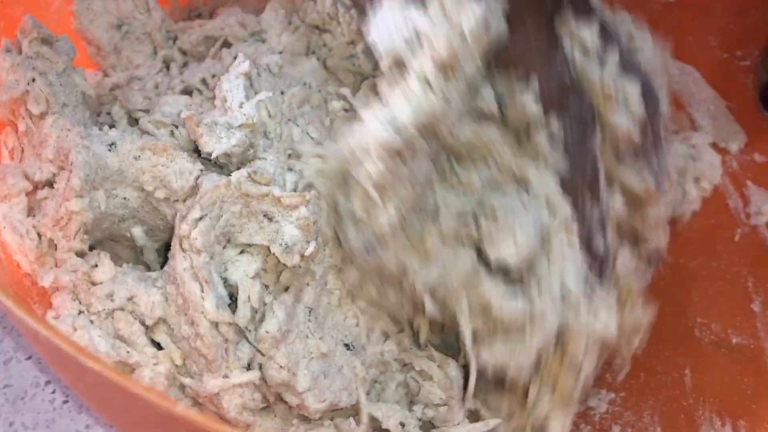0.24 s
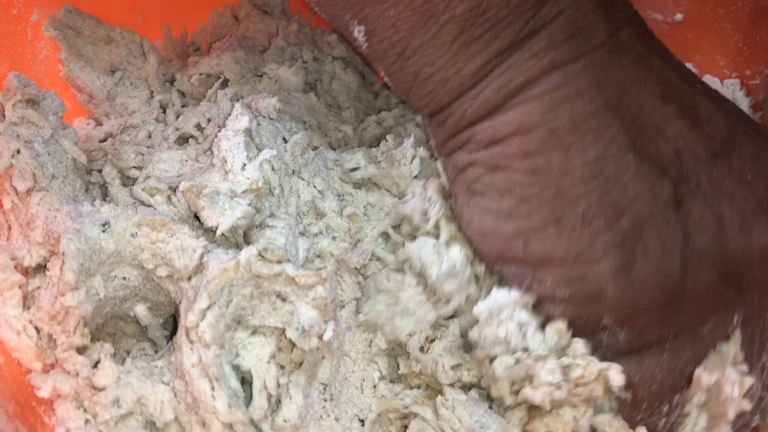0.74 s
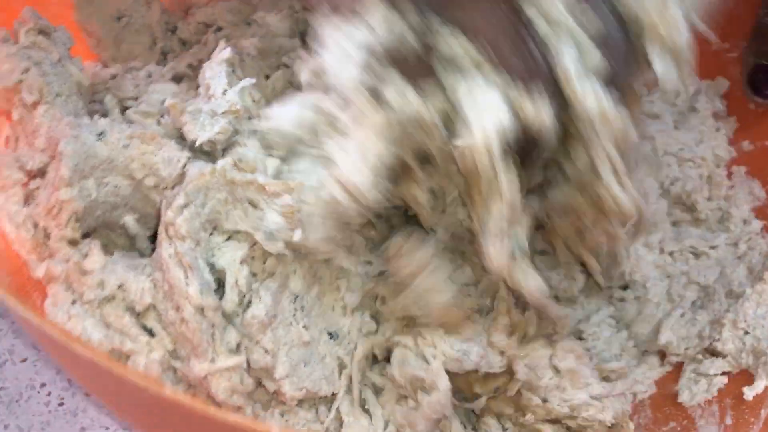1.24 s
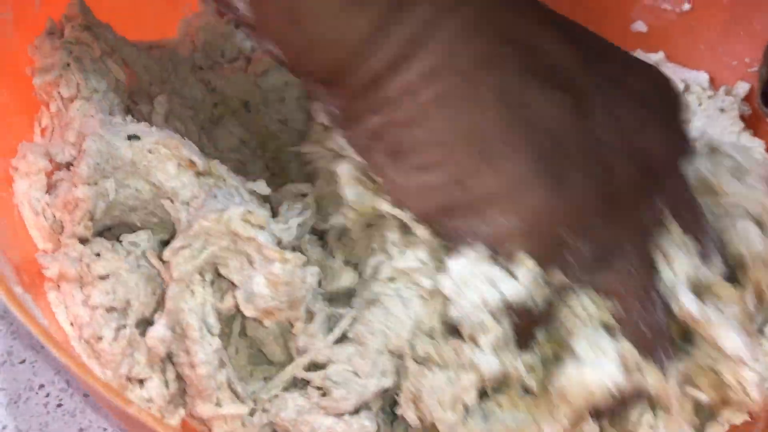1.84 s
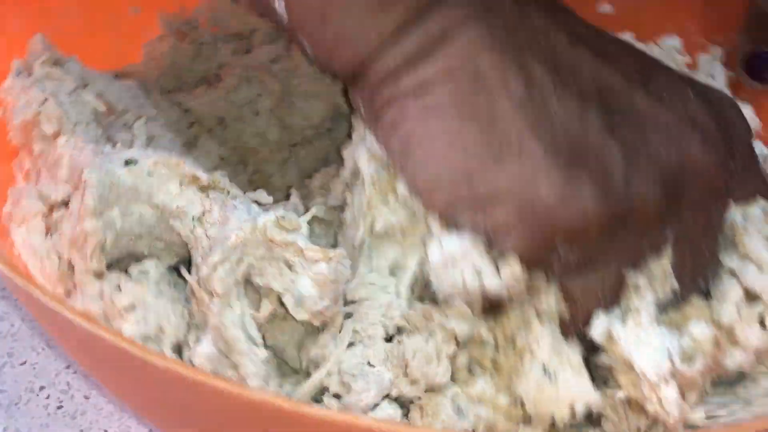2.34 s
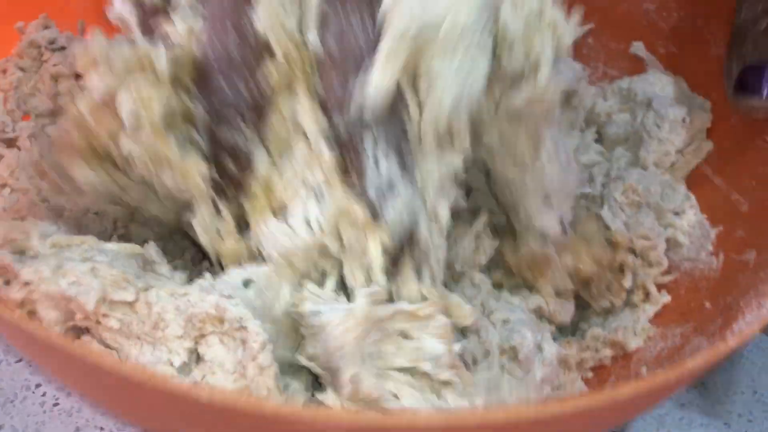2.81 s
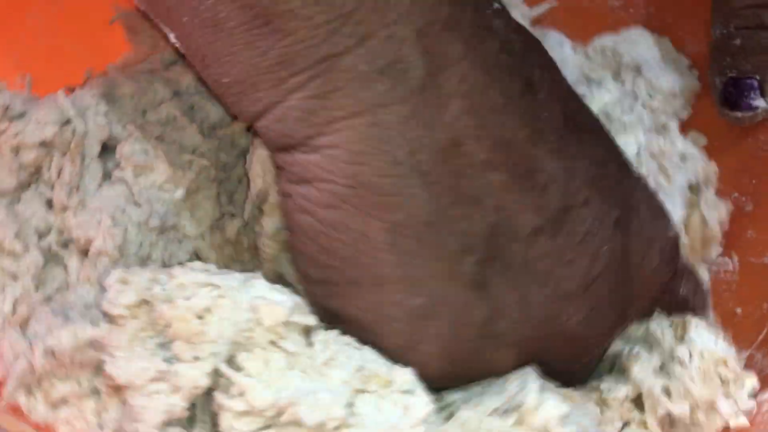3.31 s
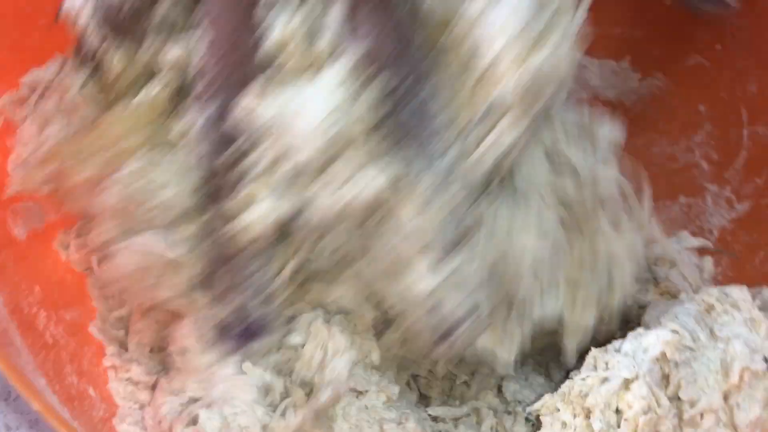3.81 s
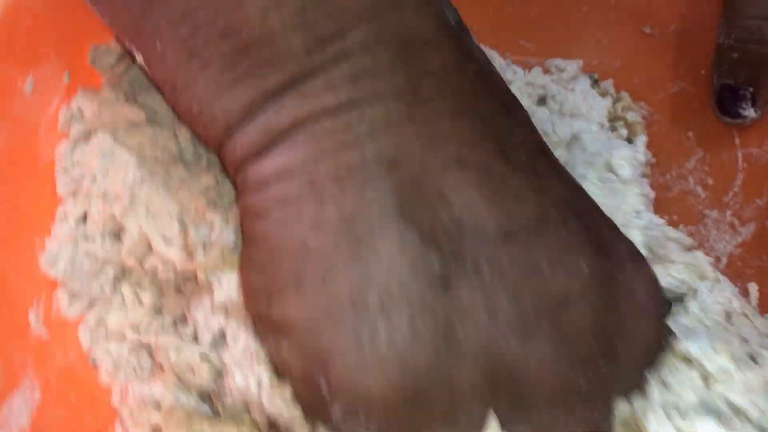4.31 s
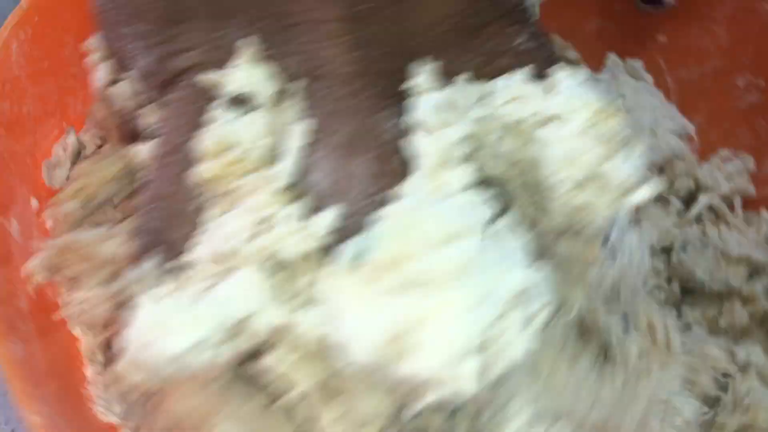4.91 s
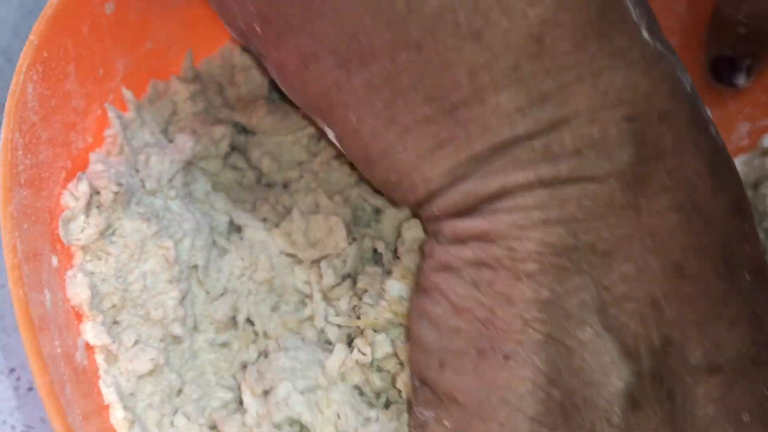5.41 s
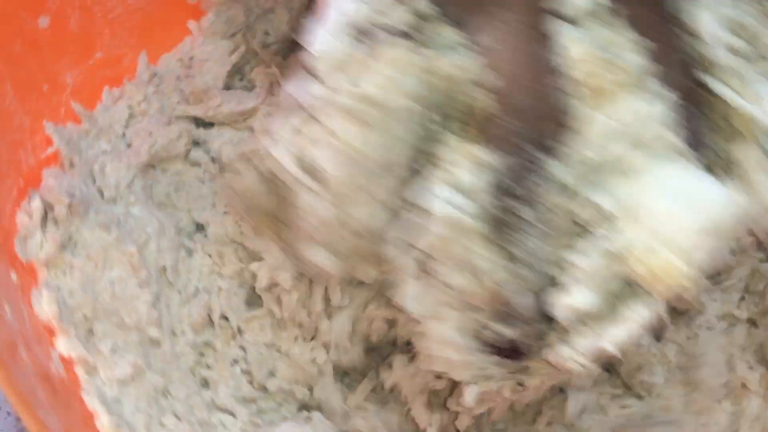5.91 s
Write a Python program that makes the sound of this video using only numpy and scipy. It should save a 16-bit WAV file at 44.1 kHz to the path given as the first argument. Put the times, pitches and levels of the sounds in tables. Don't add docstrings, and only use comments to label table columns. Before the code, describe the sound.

Close, gritty kneading of shaggy dough in a plastic bowl: dry scrapes, sticky squelches, crumb ticks and sudden dull thumps on a counter.

```python
import sys
import numpy as np
from scipy import signal
from scipy.fft import rfft, irfft
from scipy.io import wavfile
from scipy.ndimage import uniform_filter1d

SR = 44100
rng = np.random.default_rng(int(sys.argv[2]) if len(sys.argv) > 2 else 0)


def linear_from_db(decibels):
    return 10 ** (np.asarray(decibels, float) / 20)


def to_wav(s):
    ch = np.atleast_2d(s).T
    pcm = np.round(np.clip(ch, -1, 1) * 32767)
    wavfile.write(sys.argv[1], SR, pcm.astype(np.int16))


N = 271209
CONTROL = 64


def evened(x):
    return x / np.sqrt(np.mean(x ** 2) + 1e-20)


def add(mix, s, sound):
    part = mix[round(s * SR):][:len(sound)]
    part += sound[:len(part)]


def coloured(x, points):
    hz = np.fft.rfftfreq(len(x), 1 / SR)
    f, db = np.transpose(points)
    curve_db = np.interp(np.log(hz + 1), np.log(f + 1), db)
    return evened(irfft(rfft(x) * linear_from_db(curve_db), len(x)))


def resonate(x, hz, width_hz):
    return signal.lfilter(*signal.iirpeak(hz, hz / width_hz, SR), x)


def grit(spread_db, flutter_db, flutter_s):
    clumps = evened(uniform_filter1d(rng.standard_normal(N), int(flutter_s * SR)))
    size_db = spread_db * np.minimum(rng.exponential(1, N), 5)
    return evened(rng.standard_normal(N) * linear_from_db(size_db + flutter_db * clumps))


def ringing(hz, cycles, glide, t):
    turns = hz * t * (1 + glide * hz * t / cycles)
    wave = np.sin(2 * np.pi * turns) * hz * t * np.exp(-2.5 * hz * t / cycles)
    return wave / abs(wave).max()


def swell(s, db, rise_s, fall_s):
    t = np.arange(0, N + CONTROL, CONTROL) / SR - s
    rise, fall = abs(t / rise_s) ** 1.77, abs(t / fall_s) ** 1.39
    return linear_from_db(db - 10 * np.where(t < 0, rise, fall)) ** 2 + 1e-14


def swells(table):
    return np.array([swell(*row[:4]) for row in table])


def gain(power):
    return np.interp(np.arange(N) / CONTROL, np.arange(len(power)), np.sqrt(power))


# f/Hz, level/dB per Hz
ROOM_TONE = [(18, -44), (30, 5.5), (81, 3.5), (169, 0.5), (335, -7), (1990, -15.5), (8640, -26),
             (15800, -30)]
# f/Hz, width/Hz, level/dB rms
APPLIANCES = [(103.45, 3.9, -71), (178.1, 5, -70), (391.3, 3, -76.5)]


def kitchen():
    lines = sum(linear_from_db(db) * evened(resonate(rng.standard_normal(N), hz, w)) for hz, w, db in APPLIANCES)
    return linear_from_db(-62.5) * coloured(rng.standard_normal(N), ROOM_TONE) + lines


def reverb(x, t60=0.3):
    t = np.arange(SR // 2) / SR
    noise = signal.lfilter([1], [1, -.5], rng.standard_normal(len(t)))
    tail = noise * linear_from_db(-60 * t / t60) * (t > .004)
    return signal.fftconvolve(x, tail / np.linalg.norm(tail))[:N]


def strays():
    per_s, pitches = 60, np.geomspace(5000, 13000, 6)
    falls = rng.random(N) < per_s / SR
    shake = gain(swell(1.4, -66, .7, .7))
    size = shake * linear_from_db(3.5 * np.minimum(rng.exponential(1, N), 3)) * falls
    kind, t = rng.integers(0, 6, N), np.arange(200) / SR
    return sum(signal.oaconvolve(size * (kind == k), ringing(hz, 2.0, 0, t))[:N]
               for k, hz in enumerate(pitches))


# f/Hz, level/dB, t60/s
BOWL_MODES = [(81.8, 1, 0.21), (133.4, 2.5, 0.23), (145.6, -11.5, 1), (216, -6, 0.12), (243, 2.5, 0.105),
              (348, -15, 0.35), (482, -4, 0.042), (642, -4, 0.033), (840, 5.5, 0.012), (1174, 2, 0.01),
              (1900, -18.5, 0.021), (184.6, -16, 0.052), (550, -16, 0.1), (431, -22, 0.15)]
# peak t/s, level/dB, rise and fall/s, deepest modes over it/dB
LEANS = [(0.0, -56.5, 0.17, 1.5), (0.55, -62, 0.19, 8.5), (1.21, -68, 0.062, 4), (1.39, -73.5, .04, 17.5),
         (1.57, -70, 0.13, 6), (2.27, -73, 0.13, -6), (2.6, -59, 0.31, -11), (3.09, -61.5, 0.17, 10.5),
         (3.52, -65, 0.18, 14.5), (3.95, -52, .07, -5), (4.18, -72, 0.064, -14), (4.46, -69.5, 0.21, -8),
         (4.84, -65, 0.062, 9), (5.05, -66, .08, -5), (5.28, -57, 0.33, 2.5), (5.62, -62.5, 0.054, 2),
         (5.88, -64.5, 0.15, 8)]


def weight():
    rest_db, rest_deep_db = -68, -65
    leans = np.array([swell(s, db, length, length) for s, db, length, _ in LEANS])
    deep_db = np.transpose(LEANS)[-1]
    shoves = grit(spread_db=4.0, flutter_db=2.5, flutter_s=0.021)
    modes = [linear_from_db(db) * evened(resonate(shoves, hz, 1.44 * 1.5 / t60)) for hz, db, t60 in BOWL_MODES[:6]]
    deep = modes[0] + evened(resonate(shoves, 103, 20))
    press = gain(linear_from_db(rest_db) ** 2 + leans.sum(0))
    heavy = gain(linear_from_db(rest_deep_db) ** 2 + linear_from_db(deep_db) ** 2 @ leans)
    return linear_from_db(-4.0) * (press * evened(sum(modes[1:])) + heavy * evened(deep))


# peak t/s, level/dB, rise/s, fall/s
SHIVERS = [
    (2.76, -59, .05, .2),
    (2.93, -57.5, 0.17, .12),
    (3.12, -56, .1, 0.08),
]


def judder():
    turn = 2 * np.pi * 66 * np.arange(N) / SR
    wave = np.sin(turn) + linear_from_db(-4.5) * np.sin(2 * turn)
    return np.sqrt(2) * gain(swells(SHIVERS).sum(0)) * wave


# peak t/s, level/dB, rise/s, fall/s
DUST = [(1.14, -72, .05, .05), (1.686, -63, .006, .008), (1.76, -62, .007, .01), (2.735, -64, .008, .03),
        (2.8, -63, .02, .02), (4.93, -66, .05, .08), (4.76, -72, .06, .06), (5.048, -58, .006, .01),
        (5.68, -58, .025, .06), (6.0, -68, .06, .08), (6.12, -68, .02, .05)]
# peak t/s, level/dB, rise/s, fall/s
SQUEEZES = [(0.2, -68, 0.064, 0.074), (1.0, -72, .05, 0.065), (1.72, -65, .05, 0.036),
            (2.5, -63.5, 0.18, .05), (2.62, -69, 0.029, .04), (3.5, -64, .1, 0.12), (3.9, -64, 0.069, .06),
            (4.75, -64, 0.067, 0.032), (5.33, -58, .05, 0.21), (5.6, -65, 0.086, 0.14),
            (5.851, -67, 0.1, 0.04)]
# peak t/s, rasp level/dB, rise/s, fall/s, rasp centre f/Hz
SWEEPS = [(0.0, -45.5, .1, .13, 2830), (0.44, -53, .11, 0.12, 2900), (0.69, -56.5, 0.13, 0.18, 2800),
          (0.938, -62, 0.082, 0.048, 2500), (1.45, -67.5, 0.11, 0.44, 2370),
          (1.77, -79, 0.036, 0.021, 2100), (2.27, -58.5, 0.11, 0.24, 2100),
          (2.42, -61.5, 0.19, 0.092, 3060), (2.77, -64.5, 0.062, 0.035, 3120),
          (3.12, -61.5, 0.04, 0.5, 2025), (3.32, -58, 0.2, .25, 2680), (3.49, -50, 0.094, 0.061, 2420),
          (3.823, -49.5, 0.033, 0.019, 2070), (3.97, -56.5, 0.075, 0.094, 2230),
          (4.27, -69, 0.061, 0.05, 1900), (4.64, -61, 0.09, 0.04, 3200), (5.1, -62.5, 0.075, 0.13, 2420),
          (5.185, -49.5, 0.059, 0.066, 1900), (5.33, -50, 0.068, 0.14, 2980), (5.5, -60, .2, 0.25, 2950),
          (5.7, -55.5, 0.037, .06, 2650), (6.15, -75, .06, 0.087, 2250)]
# peak t/s, rasp level/dB, rise/s, fall/s, hollow over the rasp/dB
RUBS = [(0.345, -61.5, 0.017, 0.18, -4.5), (0.55, -57, 0.07, 0.14, -2), (0.9, -59, 0.19, 0.14, -1),
        (1.65, -68, 0.042, .04, 0.5), (1.82, -63.5, 0.082, 0.11, -0.5), (2.05, -69.5, 0.46, 0.39, -0.5),
        (2.21, -62.5, 0.043, 0.12, -1), (2.26, -66, 0.067, 0.091, 12), (2.66, -61.5, 0.075, 0.021, -8),
        (2.89, -65.5, 0.021, 0.019, 6), (2.975, -64, 0.06, 0.077, -4), (3.075, -58.5, 0.038, 0.18, -4),
        (3.24, -58, 0.042, 0.15, 0.5), (3.668, -60.5, 0.059, .1, -4.5), (3.79, -53.5, 0.061, 0.033, -5),
        (4.015, -59, 0.029, 0.086, 8), (4.09, -63.5, 0.044, 0.36, 3), (4.27, -57.5, .12, .09, -4),
        (4.47, -67, 0.07, 0.26, 0), (4.64, -57.5, 0.13, 0.067, -6.5), (4.94, -59.5, .1, 0.15, -6),
        (5.15, -55, .07, 0.052, -17), (5.725, -54.5, 0.039, 0.048, -5.5), (6.13, -63.5, 0.052, 0.11, 0)]
RUB_HZ = 2050
# f/Hz, level/dB per Hz
WALL_RASP = [(700, -23), (1300, -2), (2100, -4.5), (2800, -6.5), (3600, -3.5), (5000, -5), (7000, -12),
             (11000, -17.5)]
# f/Hz, level/dB per Hz
FLOUR_HISS = [(3500, -31), (6000, -3.5), (8000, -5.5), (10000, -7.5), (13000, -6), (15000, -6.5),
              (16000, 1)]
# f/Hz, width/Hz, level/dB
BOWL_AIR = [(597, 125, -2.5), (964, 253, -4)]


def strokes():
    sweeps, rubs = swells(SWEEPS), swells(RUBS)
    sweep_hz, rub_hollow_db = np.transpose(SWEEPS)[-1], np.transpose(RUBS)[-1]
    dry, damp = sweeps.sum(0), rubs.sum(0)
    centre_hz = gain((sweep_hz ** 2 @ sweeps + RUB_HZ ** 2 * damp) / (dry + damp))
    crumbs = grit(spread_db=2.5, flutter_db=0.62, flutter_s=0.013)
    wall = shifting(coloured(crumbs, WALL_RASP), centre_hz, lift_db=8.5, octaves=0.66, patchy_db=1.3)
    hiss = shifting(coloured(crumbs, FLOUR_HISS), centre_hz, lift_db=-6, octaves=0.93, patchy_db=2.0)
    lumps = grit(spread_db=2.5, flutter_db=2.0, flutter_s=0.013)
    hollow = sum((-1) ** k * linear_from_db(db) * resonate(lumps, hz, w) for k, (hz, w, db) in enumerate(BOWL_AIR))
    hollow = evened(resonate(hollow, 1510, 1070))
    airy = linear_from_db(1.5) ** 2 * dry + linear_from_db(-10) ** 2 * damp + swells(DUST).sum(0)
    boxy = linear_from_db(-11.5) ** 2 * dry + linear_from_db(rub_hollow_db) ** 2 @ rubs + swells(SQUEEZES).sum(0)
    return gain(dry + damp) * wall + gain(airy) * hiss + gain(boxy) * hollow


def shifting(x, centre_hz, lift_db, octaves, patchy_db):
    hz, t, z = signal.stft(x, SR, nperseg=256, noverlap=192)
    centre = centre_hz[np.minimum((t * SR).astype(int), N - 1)]
    bump = np.exp(-.5 * (np.log2((hz[:, None] + 1) / centre) / octaves) ** 2)
    patches = uniform_filter1d(rng.standard_normal(z.T.shape).T, 4, 0)
    patches = evened(uniform_filter1d(patches, 30, 1))
    shaped = z * linear_from_db(lift_db * bump + patchy_db * patches)
    return evened(signal.istft(shaped, SR, nperseg=256, noverlap=192)[1][:N])


# multiple of the lowest f, width/Hz, level/dB
WALL_MODES = [(1, 417, 6), (1.55, 600, -3.5)]
# peak t/s, level/dB, rise/s, fall/s, wall resonance f/Hz
SQUEALS = [
    (0.05, -60, 0.063, 0.071, 2230),
    (2.8, -70, 0.057, .03, 3540),
    (3.82, -50, 0.045, 0.025, 2140),
    (3.95, -54.5, 0.015, 0.035, 2240),
    (4.28, -58.5, 0.12, 0.054, 1720),
    (4.67, -59.5, 0.077, 0.023, 2010),
    (4.76, -67.5, 0.073, 0.028, 3580),
    (5.35, -54.5, 0.095, 0.065, 3100),
    (5.98, -67, 0.04, 0.021, 2100),
]


def squeals():
    stick = grit(spread_db=2.5, flutter_db=1.5, flutter_s=0.0049)

    def ring(hz):
        modes = [linear_from_db(db) * evened(resonate(resonate(stick, k * hz, w), k * hz, 2 * w))
                 for k, w, db in WALL_MODES]
        return evened(sum(modes))

    cling = gain(swells(RUBS).sum(0)) * linear_from_db(-14) * ring(RUB_HZ)
    return cling + sum(gain(swell(*row[:4])) * ring(row[-1]) for row in SQUEALS)


# t/s, level/dB rms, length/s, f/Hz
SLIPS = [(1.34, -65, 0.018, 3000), (1.592, -67, 0.068, 2190), (1.682, -58.5, 0.011, 2030),
         (1.752, -58, 0.0158, 2030), (2.74, -66, 0.088, 3550), (2.823, -61, 0.008, 2500),
         (2.66, -61, 0.015, 1900), (1.635, -64, 0.018, 1950), (1.64, -68, 0.012, 5000),
         (0.852, -60, 0.068, 950), (5.29, -56, 0.1, 950), (5.11, -58, 0.06, 3400), (0.16, -62, .05, 2100),
         (2.785, -63, 0.038, 4500), (2.86, -55, 0.043, 1990), (2.866, -59, 0.042, 1000),
         (3.81, -55, 0.022, 2080), (4.031, -48, 0.022, 2380), (5.036, -55, 0.061, 2380),
         (5.2, -41.5, 0.01, 2000), (5.049, -55, 0.045, 1350), (5.158, -53, 0.019, 1400)]


def slips():
    out = np.zeros(N)
    for s, db, length, hz in SLIPS:
        noise = rng.standard_normal(SR // 8)[:int(length * SR)]
        wall = resonate(resonate(noise, hz, 0.3 * hz), hz, 0.4 * hz)
        burst = evened(0.13 * noise + 1.3 * wall)
        add(out, s, linear_from_db(db) * burst * signal.windows.tukey(len(noise), .15))
    return out


# t/s, peak level/dB, f/Hz
TICKS = [(0.1804, -51, 12500), (0.2224, -42, 9600), (0.3815, -39, 8700), (0.8714, -47, 8200),
         (0.9018, -42, 13200), (0.9802, -40, 13900), (1.0211, -40, 11300), (1.1119, -51, 14000),
         (1.2087, -43.5, 12200), (1.2381, -58, 12700), (1.29, -49, 10000), (1.3149, -46, 11200),
         (1.3818, -45, 11800), (1.4147, -41, 9550), (1.498, -46, 9570), (1.5624, -57, 7910),
         (1.7828, -44, 11500), (1.9809, -38.5, 10700), (2.0338, -55, 7920), (2.5611, -56, 7530),
         (3.895, -57, 10000), (3.8984, -49, 13700), (4.2941, -42, 11500), (5.8064, -54, 11000),
         (4.864, -56, 12500), (5.03, -55, 13000), (5.76, -52, 12500)]
# t/s, peak level/dB, f/Hz
CRACKS = [(1.3556, -48, 5000), (1.4185, -44, 4800), (3.0716, -37, 4940), (5.8227, -50, 5500),
          (0.2987, -51, 2780), (0.381, -46, 3900), (1.04, -55, 6000), (1.29, -53, 5500),
          (1.3263, -55, 4390), (1.431, -51, 2600), (1.4415, -53, 1900), (1.465, -55, 3300),
          (1.476, -53, 3600), (1.518, -53, 2100), (1.5463, -54, 2260), (1.7318, -54, 1640),
          (1.754, -51, 4500), (1.788, -52, 5500), (1.8077, -51, 1990), (4.8251, -56, 4500),
          (5.3255, -40, 2760), (5.8064, -55, 4000), (6.1052, -52, 1600)]


def ticks():
    out, t = np.zeros(N), np.arange(3000) / SR
    for s, db, hz in TICKS + CRACKS:
        add(out, s + 0.00099, linear_from_db(db) * ringing(hz, 1.45, 0, t))
    return out


# t/s, peak level/dB, f/Hz
POPS = [(0.444, -33, 685), (0.475, -34.5, 690), (0.505, -39, 680), (0.514, -47, 750), (0.529, -43, 750),
        (0.538, -48, 600), (0.571, -40, 850), (0.575, -41, 600), (0.586, -45, 950), (0.602, -42, 570),
        (0.61, -37.5, 673), (0.854, -40.5, 940), (0.862, -46, 900), (0.885, -47, 800), (0.893, -46, 1000),
        (0.905, -46, 900), (0.914, -38, 720), (1.0, -50, 800), (1.971, -51, 1000), (2.227, -46, 1180),
        (2.234, -44, 1050), (2.257, -42, 1090), (2.266, -37, 1070), (3.234, -64, 918), (4.827, -49, 595),
        (1.801, -48, 900), (1.812, -46, 950), (1.82, -48, 800), (2.635, -46, 750), (4.014, -42, 750),
        (4.045, -38, 900), (5.328, -38, 850), (5.365, -41, 950), (5.415, -42, 850)]


def pops():
    out, t = np.zeros(N), np.arange(3000) / SR
    for s, db, hz in POPS:
        add(out, s, linear_from_db(db - 6.0) * ringing(1.64 * hz, 3.74, -0.326, t))
        add(out, s + 0.0025, linear_from_db(db - 18.0) * ringing(0.7 * hz, 2.2, -0.15, t))
    return out


# t/s, peak level/dB, f/Hz,
# cycles, bright tick over the peak/dB
SNAPS_AND_SLAPS = [(0.3302, -40.5, 4006, 2.2, -20), (0.339, -49, 2650, 3.9, -16), (1.071, -44, 3040, 2.5, -18),
                   (1.344, -51, 2300, 2.5, -16), (1.373, -45.5, 2310, 5, -12), (1.3745, -56, 935, 2.9, -20),
                   (1.4416, -55, 1000, 3.0, -16), (3.15, -31.5, 1980, 2.7, -20), (3.183, -29, 1570, 2.3, -25),
                   (5.1685, -36.5, 1260, 2.1, -14), (5.3267, -58, 900, 2.2, -23),
                   (2.9380, -26.5, 3300, 2.2, -9), (2.931, -52, 3000, 9, -6), (2.9387, -32, 2300, 4.9, -3),
         (2.9455, -29, 1900, 1.8, -8), (2.944, -36.5, 860, 1.7, -20), (3.777, -33, 1510, 2.5, -9),
         (3.7766, -35.5, 4200, 4.2, -26), (3.1508, -42.5, 660, 1.9, -28), (3.1853, -43.5, 716, 1.6, -30),
         (3.9982, -41.5, 975, 2.4, -26), (4.0479, -30, 2700, 1.1, -3), (4.054, -26, 2300, 1.7, -6),
         (4.061, -39, 2210, 2, -4), (4.8926, -38, 1800, 1.5, -22), (5.0546, -42, 2600, 1.3, -10),
         (5.1985, -35.5, 1350, 3.3, 4), (5.1985, -38, 5100, 1.5, -6), (5.204, -31, 2100, 1.9, -16),
         (2.944, -37, 140, 4.5, -40), (4.0515, -39, 195, 1.9, -40), (4.907, -28.5, 108, 1.6, -40),
         (3.791, -25.5, 110, 1.5, -40), (2.192, -36, 125, 1.6, -40), (4.0548, -34, 650, 2.2, -30),
         (2.9395, -38, 900, 2, -30)]


def snaps():
    out, t = np.zeros(N), np.arange(3000) / SR
    for s, db, hz, cycles, tick_db in SNAPS_AND_SLAPS:
        puff = signal.lfilter([1], [1, -.25], rng.standard_normal(len(t)))
        add(out, s, linear_from_db(db) * (ringing(hz, cycles, -0.05, t) + puff * linear_from_db(tick_db - 60 * t / 0.01)))
    return out


# t/s, peak level/dB, f/Hz
BOUNCES = [(2.261, -48, 190), (3.837, -34, 300), (3.857, -34, 220), (3.872, -37, 320), (3.9, -40, 230),
           (3.936, -42, 285), (3.9975, -40, 620), (4.0555, -31, 205), (4.066, -42, 125), (4.954, -41, 230),
           (4.975, -40, 230), (5.017, -44, 210)]


def bounces():
    out, t = np.zeros(N), np.arange(3000) / SR
    for s, db, hz in BOUNCES:
        add(out, s, linear_from_db(db) * ringing(hz, 1.6, -0.1, t))
    return out


# t/s, peak level/dB, tilt/dB per octave, extra knuckle level at 400-700 Hz/dB, ring factor
KNOCKS = [
    (2.1773, -34, -0.5, -2, 0.59),
    (2.9391, -34, -1.5, -3, 0.57),
    (3.7761, -16.5, -1.6, 1.2, 0.62),
    (3.997, -38, 5, 6, 0.32),
    (4.0526, -33, 4, 11.5, 0.5),
    (4.8928, -26.5, -4, 8, 0.85),
    (5.2024, -39, 1, 6, 0.82),
]
# pitch factor of the 200-300 Hz modes, lowered by dough on the base
BASE_PITCH = [
    1.04,
    1.0,
    1.0,
    1.0,
    0.9,
    0.92,
    1.0,
]


def knocks():
    out, t = np.zeros(N), np.arange(SR // 2) / SR
    for (s, peak_db, tilt_db, knuckle_db, ring), base in zip(KNOCKS, BASE_PITCH):
        sound = np.zeros(len(t))
        detune = rng.uniform(0.98, 1.015, len(BOWL_MODES))
        deep_db = -7 - 0.42 * (peak_db + 47)
        for (hz, db, t60), d in zip(BOWL_MODES, detune):
            deep = hz < 170
            delay_s = 0.0035 * (np.sqrt(250 / max(hz, 190)) - .35) + 0.009 * deep
            late = np.maximum(t - delay_s, 0)
            db = db + tilt_db * np.log2(hz / 250) + deep_db * deep + knuckle_db * (400 < hz < 700)
            pitch = hz * d * (base if 200 < hz < 300 else 1)
            onset = -np.expm1(-1.8 * hz * late)
            sound += linear_from_db(db - 60 * late / (t60 * ring)) * np.sin(2 * np.pi * pitch * late) * onset
        rattle = evened(resonate(resonate(rng.standard_normal(len(t)), 198, 140), 230, 220))
        rattle = linear_from_db(-21 - 60 * t / 0.5) * rattle * -np.expm1(-t / 0.045)
        add(out, s, linear_from_db(peak_db) * (sound / abs(sound).max() + rattle))
    return out


def scene():
    hits = knocks() + bounces() + snaps() + pops() + ticks() + slips()
    hand = strokes() + squeals() + weight() + judder() + strays()
    return (kitchen() + hand + hits + linear_from_db(-15.5) * reverb(hits))[None]


def band_limit(x):
    return signal.sosfilt(signal.butter(12, 17020, fs=SR, output="sos"), x)


def record(dry):
    thin = signal.sosfilt(signal.butter(4, 55, "highpass", fs=SR, output="sos"), dry)
    edge = signal.firwin(1023, 15850, window=("kaiser", 7), fs=SR)
    mix = signal.oaconvolve(thin, edge[None], "same")
    return band_limit(mix)


dry = scene()
out = record(dry)
to_wav(out)
```